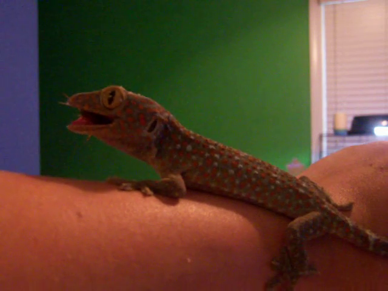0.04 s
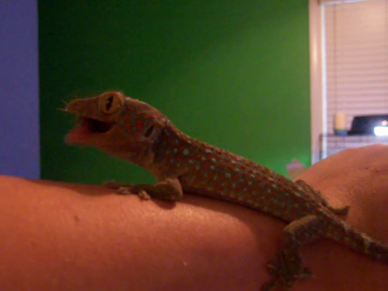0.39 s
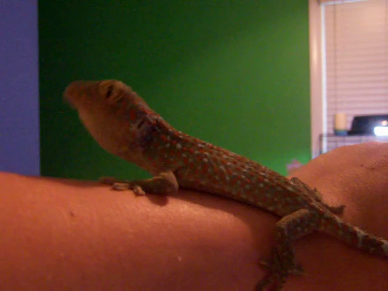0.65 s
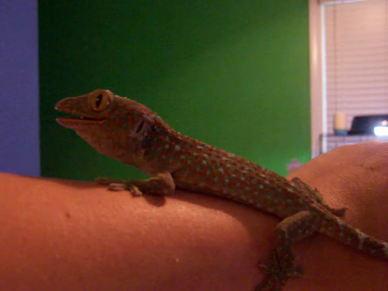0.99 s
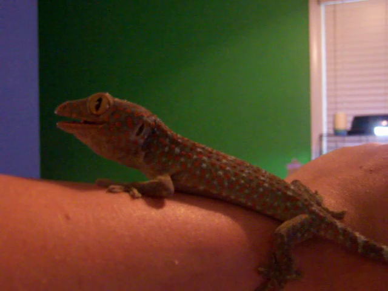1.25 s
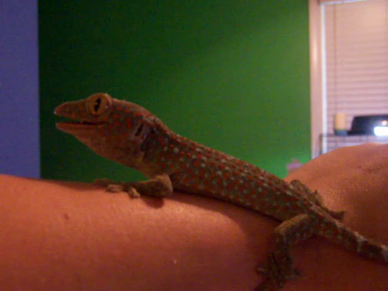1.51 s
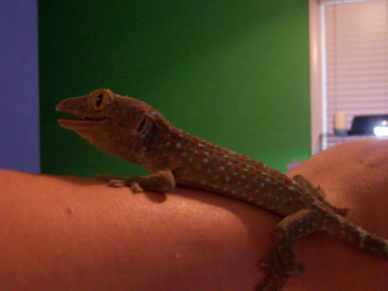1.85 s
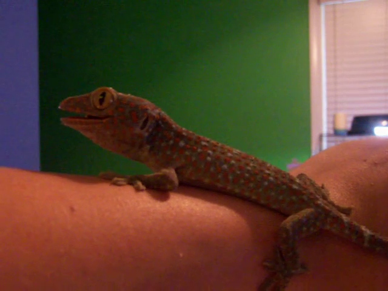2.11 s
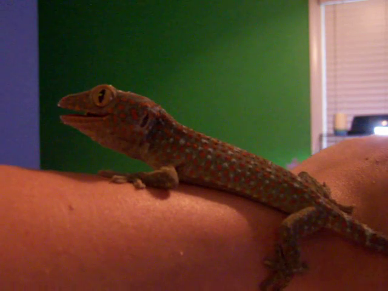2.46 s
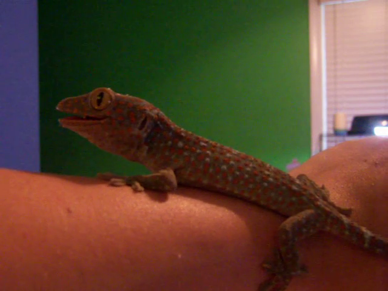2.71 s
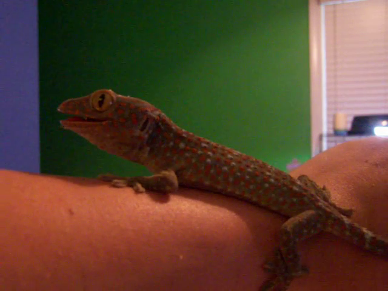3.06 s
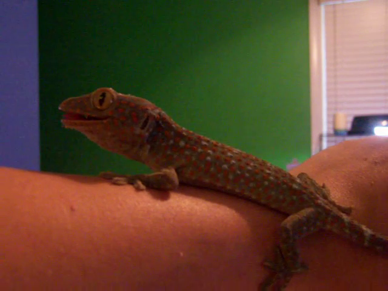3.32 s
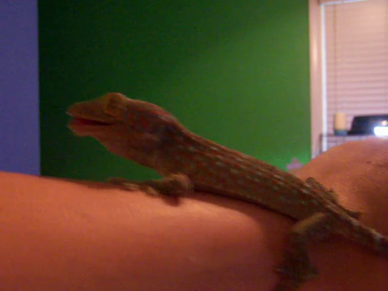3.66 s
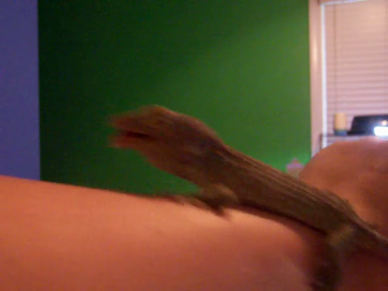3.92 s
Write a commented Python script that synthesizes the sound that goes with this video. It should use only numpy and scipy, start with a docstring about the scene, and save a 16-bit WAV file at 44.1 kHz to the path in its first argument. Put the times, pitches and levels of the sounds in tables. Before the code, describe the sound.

A gecko gives six thin, raspy chirps over quiet room hiss and hum.

```python
"""A gecko held on an arm gives six thin, raspy chirps, two a second, in a small room. Each is turbulence
driving narrow resonances: a fluttering rasp, then a whistle near 2.9 kHz. Faint lower tones and stray squeaks
trail the chirps. Scales rustle on skin as the animal shifts, and its jaws shut with one sharp click. Underneath
lie mains hum, a faint whine and microphone hiss."""
import sys
import numpy as np
from scipy import signal
from scipy.fft import rfft, irfft
from scipy.io import wavfile

SR = 44100
rng = np.random.default_rng(int(sys.argv[2]) if len(sys.argv) > 2 else 0)


def dump(signal):
    """Clip the signal to [-1, 1] and save it as 16-bit WAV at the path in sys.argv[1]."""
    limited = np.clip(np.atleast_2d(signal).T, -1, 1)
    pcm = np.round(limited * 32767).astype(np.int16)
    wavfile.write(sys.argv[1], SR, pcm)


N = 176400
T = np.arange(N) / SR
HZ = np.arange(N // 2 + 1) * SR / N

# The gecko's calls: t/s, length/s, whistle f/Hz, whistle level/dB, split tone level/dB, rasp lead/s,
# rasp f/Hz, rasp level/dB, ring f/Hz, ring level/dB, puff level/dB
CHIRPS = [(0.110, .11, 2916, -32.5, -38, .035, 3780, -45.5, 4170, -46.5, -45.5),
          (0.610, .155, 2934, -32, -45, 0.042, 3970, -44.5, 4190, -47, -53),
          (1.100, .17, 2850, -40.5, -46, .03, 4110, -48.5, 4260, -43.5, -52),
          (1.611, .14, 2934, -34.5, -43.5, 0.046, 3955, -37, 4274, -39.5, -38.5),
          (2.144, .11, 2867, -36, -40, .07, 3790, -42, 4084, -46.5, -43.5),
          (2.620, 0.13, 2905, -37.5, -41, .04, 4020, -42.5, 4290, -43.5, -44)]
# EQ curve of the puff of hiss in each chirp: f/Hz, relative level/dB
PUFF_EQ = [(700, -29.5), (1300, -11.5), (1700, -2), (2250, 0.5), (2700, -4), (3300, -11.5), (4500, -2.5),
           (5500, -2.5), (7000, -9.5), (9000, -28)]
# Soft tones around the chirps: t/s, length/s, f/Hz, level/dB
LOW_TONES = [(.01, 0.14, 2203, -48.5), (0.222, 0.13, 1605, -51), (0.564, 0.057, 2130, -44.5),
             (0.783, .10, 1576, -48), (.96, 0.082, 2067, -50), (1.073, 0.08, 2120, -45.5),
             (1.275, 0.11, 1597, -49.5), (1.413, 0.26, 2100, -48.5), (1.777, 0.11, 1557, -47),
             (1.899, 0.31, 1997, -48.5), (2.247, 0.12, 1600, -47), (2.427, 0.14, 2033, -47.5),
             (2.49, 0.068, 1598, -49.5), (2.592, .12, 2180, -48), (2.79, 0.031, 1550, -50.5),
             (2.906, 0.053, 2085, -49)]
# Stray squeaks: t/s, length/s, f/Hz, width/Hz, level/dB
SQUEAKS = [(0.407, 0.036, 1720, 43, -50), (0.452, 0.051, 2380, 80, -44.5), (0.838, 0.032, 3200, 13, -46),
           (1.044, 0.055, 1325, 170, -52.5), (1.179, 0.0061, 2812, 13.4, -26), (1.186, .04, 2420, 110, -45),
           (1.271, 0.011, 2886, 18, -34), (1.832, 0.037, 1013, 26, -50.5), (1.93, 0.055, 2390, 59, -43.5),
           (3.111, 0.029, 3190, 86, -45), (3.247, 0.02, 2010, 32, -46), (3.587, 0.036, 923, 76, -52.5),
           (3.669, 0.062, 2256, 290, -45.5), (3.798, 0.059, 2800, 180, -47), (3.78, 0.045, 1543, 85, -51.5)]
# Modes rung by the jaw snap: f/Hz, level/dB, t60/s
JAW_MODES = [(2600, -14.5, 0.0027), (5300, 0.5, 0.0023)]
# Scales brushing skin: t/s, length/s, centre f/Hz, half width/Hz, level/dB
RUSTLES = [(0.064, .09, 5820, 1700, -42.5), (0.303, 0.017, 5670, 1000, -42),
           (0.452, 0.066, 6040, 1300, -42), (0.692, .04, 7340, 700, -53), (0.768, 0.051, 6810, 900, -39.5),
           (1.251, 0.027, 6510, 1070, -46), (1.83, 0.034, 6100, 920, -46), (1.934, 0.067, 5950, 1460, -42),
           (2.558, .06, 7130, 980, -46), (2.768, 0.036, 5200, 740, -40), (3.04, .06, 4400, 1200, -49),
           (3.378, 0.041, 3800, 600, -51), (3.616, .03, 3400, 250, -52), (3.74, 0.036, 6850, 450, -50.5)]
# Noise bands of the constant light rubbing: centre f/Hz, half width/Hz, level/dB
FIDGET_BANDS = [(3696, 470, -58.5), (5050, 840, -51), (6570, 810, -56)]
# Hum partials: multiple of the mains frequency, level/dB
HUM_PARTIALS = [(1, -43.5), (2, -42), (3, -47.5), (4, -59.5), (6, -62.5), (7, -65), (8, -60.5), (10, -66),
                (11, -58), (13, -63.5), (14, -68.5), (21, -65.5), (22, -73), (24, -63)]
# EQ curve of the microphone hiss: f/Hz, relative level/dB
MIC_HISS_EQ = [(30, -10), (120, -1.5), (250, 1), (450, -2), (700, -3.5), (1000, -5.5), (1400, -4),
               (2000, -0.5), (2700, -1), (4000, 0), (5800, -1), (7000, -8.5), (8000, -10), (9000, -27.5)]
# Fader ride on the microphone hiss: t/s, level offset/dB
MIC_HISS_RIDE = [(0, 3.5), (.5, 1.5), (1.0, 1.5), (1.9, 1), (2.4, -0.5), (2.8, 0), (3.3, 1.5), (3.6, 0.5),
                 (4, 0.5)]


def chirps(sag_hz_per_s=120, split_below_hz=118, split_delay_s=.035):
    """A ringing rasp leads into a slightly sagging whistle that splits in two, with a puff of hiss."""
    out, hiss = np.zeros(N), coloured_noise(PUFF_EQ)
    flutter = flicker(depth_db=2, rate_hz=79)
    shape = dict(half_rise_s=.028, release_db_per_s=125)
    for start, length, hz, db, split_db, lead, rasp_hz, rasp_db, ring_hz, ring_db, puff_db in CHIRPS:
        pitch = hz - sag_hz_per_s * np.clip(T - start - length / 2, -length, length)
        whistle = envelope(start, length, **shape)
        # a second tone breaks out at the height of the whistle
        split = envelope(start + split_delay_s, length * .55, **shape)
        rasp = flutter * envelope(start - lead, length * .55, half_rise_s=.03, release_db_per_s=74.5)
        puff = flutter * envelope(start, length_s=.065, **shape)
        out += from_db(db) * resonance(whistle, pitch, width_hz=40, steady=.3)
        out += from_db(split_db) * resonance(split, pitch - split_below_hz, width_hz=42, steady=.3)
        out += from_db(rasp_db) * resonance(rasp, rasp_hz, width_hz=260)
        out += from_db(ring_db) * resonance(rasp, ring_hz, width_hz=60, steady=.3)
        out += from_db(puff_db) * puff * hiss
    return out


def low_tones():
    """Soft, unsteady resonances trail the chirps, near 1.6 and 2.1 kHz, mostly in turn."""
    out = np.zeros(N)
    for start, length, hz, db in LOW_TONES:
        swell = envelope(start, length, half_rise_s=.02, release_db_per_s=134)
        out += from_db(db) * resonance(swell, hz, width_hz=58)
    return out


def squeaks():
    """Short lone whistles among and after the chirps; the shorter the squeak, the tighter its tail."""
    out = np.zeros(N)
    for start, length, hz, width_hz, db in SQUEAKS:
        blip = envelope(start, length, half_rise_s=.0025, release_db_per_s=18.5 / length)
        out += from_db(db) * resonance(blip, hz, width_hz, steady=.6)
    return out


def jaw_click(start_s=.506, contact_s=.00021):
    """The jaws shut with one hard snap: two modes of opposite polarity, dead within 3 ms."""
    t = np.maximum(T - start_s, 0)
    ring = np.zeros(N)
    for k, (hz, db, t60) in enumerate(JAW_MODES):
        decay = from_db(db - 60 * np.minimum(t / t60, 5))
        ring += (-1) ** k * decay * np.sin(2 * np.pi * hz * t)
    return np.minimum(t / contact_s, 1) * ring


def rustles():
    """Friction of scales on skin: short, bright brushes of noise with a grainy texture."""
    grain = flicker(depth_db=1.5, rate_hz=270)
    out = np.zeros(N)
    for start, length, hz, width_hz, db in RUSTLES:
        brush = envelope(start, length, half_rise_s=.0084, release_db_per_s=164.5)
        out += from_db(db) * resonance(brush, hz, width_hz)
    return grain * out


def fidget():
    """A bed of slight, uneven rubbing fills the gaps between the clear rustles."""
    return sum(from_db(db) * resonance(flicker(depth_db=3, rate_hz=12), hz, width_hz)
               for hz, width_hz, db in FIDGET_BANDS)


def room(send, t60_s=.73, predelay_s=.004):
    """Diffuse reflections of the small room: a decaying noise tail with unit power gain."""
    t = T[:SR]
    tail = rng.standard_normal(SR) * from_db(-60 * t / t60_s) * (t > predelay_s)
    return signal.fftconvolve(send, tail / np.sqrt(np.sum(tail ** 2)))[:N]


def mains_hum(mains_hz=60.02):
    """Smooth electrical hum, its odd and even partials in quadrature."""
    return sum(np.sqrt(2) * from_db(db) * np.sin(2 * np.pi * k * mains_hz * T + np.pi / 2 * (k % 2))
               for k, db in HUM_PARTIALS)


def mic_hiss(level_db=-44.5):
    """The microphone's broad noise floor, drifting by a few dB."""
    ride_db = np.interp(T, *np.transpose(MIC_HISS_RIDE))
    return from_db(level_db + ride_db) * coloured_noise(MIC_HISS_EQ)


def whine(level_db=-57.5):
    """A faint, narrow band of noise holds one pitch at the back of the mix."""
    return from_db(level_db) * resonance(np.ones(N), hz=1627, width_hz=22)


def from_db(db):
    """Decibels to gain."""
    return 10 ** (np.asarray(db) / 20)


def unit_rms(x):
    """Normalise to an rms of 1."""
    return x / np.sqrt(np.mean(np.abs(x) ** 2) + 1e-20)


def wander(rate_hz, size=N):
    """A random modulator moving at up to about this rate; rms 1."""
    lowpass = signal.butter(2, rate_hz, fs=SR, output="sos")
    return unit_rms(signal.sosfilt(lowpass, rng.standard_normal(size + SR // 10))[-size:])


def flicker(depth_db, rate_hz):
    """A random tremolo gain; rms 1."""
    return unit_rms(from_db(depth_db * wander(rate_hz)))


def coloured_noise(eq):
    """White noise through an EQ curve; rms 1."""
    hz, db = np.transpose(eq)
    gain = from_db(np.interp(np.log(HZ + 1), np.log(hz), db))
    return unit_rms(irfft(rfft(rng.standard_normal(N)) * gain, N))


def resonance(level, hz, width_hz, steady=0):
    """A resonance driven by turbulence; steady runs from 0 (noise band) to 1 (even whistle)."""
    on = level > 1e-3
    a, b = wander(width_hz, on.sum()), wander(width_hz, on.sum())
    phase = 2 * np.pi * np.cumsum(np.broadcast_to(hz, N)[on]) / SR
    band = a * np.cos(phase) + b * np.sin(phase)
    power = a * a + b * b + 1e-18
    out = np.zeros(N)
    out[on] = level[on] * unit_rms(band / power ** (steady / 2))
    return out


def envelope(start_s, length_s, half_rise_s, release_db_per_s):
    """A linear fade-in centred on the start, a hold and an exponential release."""
    rise = np.clip((T - start_s) / half_rise_s / 2 + .5, 0, 1)
    return rise * from_db(-release_db_per_s * np.maximum(T - start_s - length_s, 0))


def scene(call_send_db=-5, click_send_db=-13):
    """Mono mix: the gecko up close, its calls and click sent to the room, over the background bed."""
    calls = chirps() + low_tones() + squeaks()
    click = jaw_click()
    reverb = room(from_db(call_send_db) * calls + from_db(click_send_db) * click)
    return (calls + click + rustles() + fidget() + reverb + mains_hum() + mic_hiss() + whine())[None]


def record(dry, rolloff_hz=7410, cutoff_hz=8850):
    """The recorder rolls off the top end, then cuts steeply near 9 kHz."""
    rolloff = signal.butter(6, rolloff_hz, fs=SR, output="sos")
    high_cut = signal.ellip(10, .3, 80, cutoff_hz, fs=SR, output="sos")
    return signal.sosfilt(high_cut, signal.sosfilt(rolloff, dry))


dry = scene()
out = record(dry)
dump(out)
```